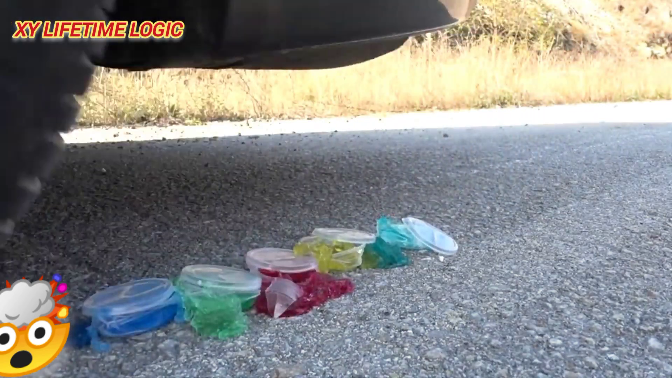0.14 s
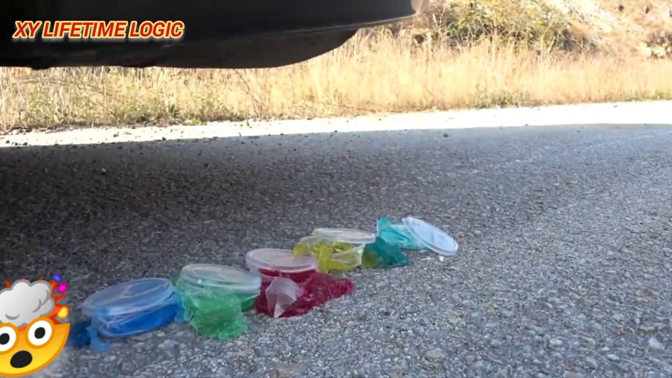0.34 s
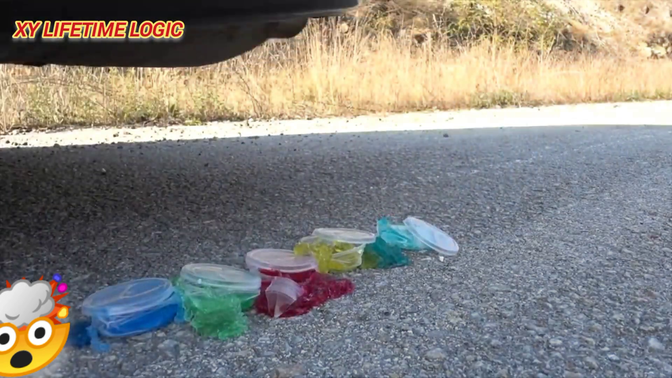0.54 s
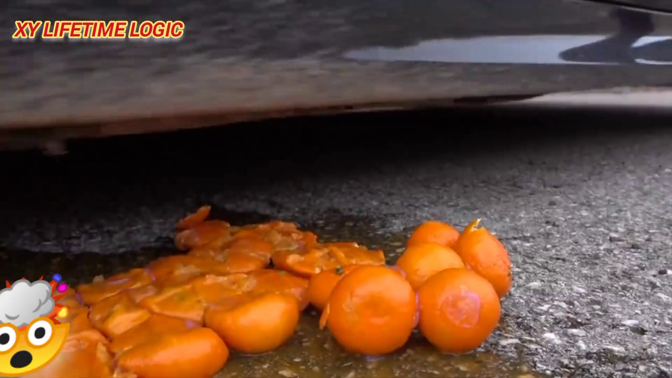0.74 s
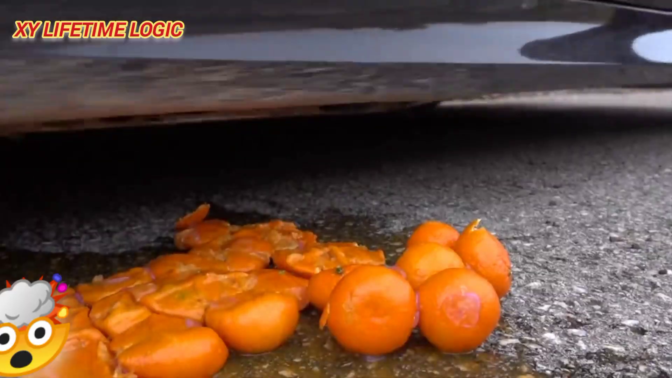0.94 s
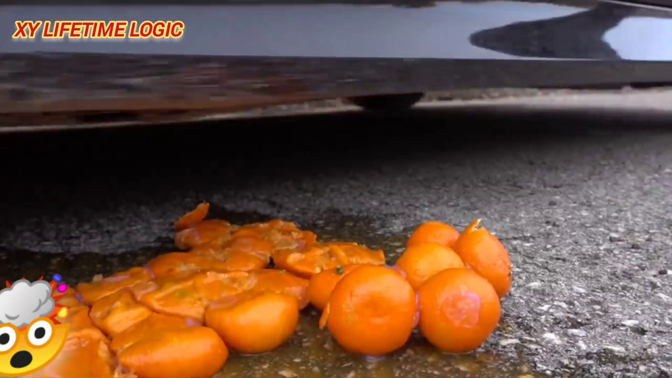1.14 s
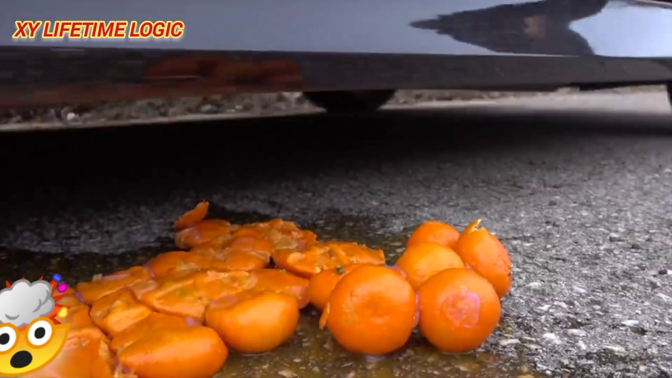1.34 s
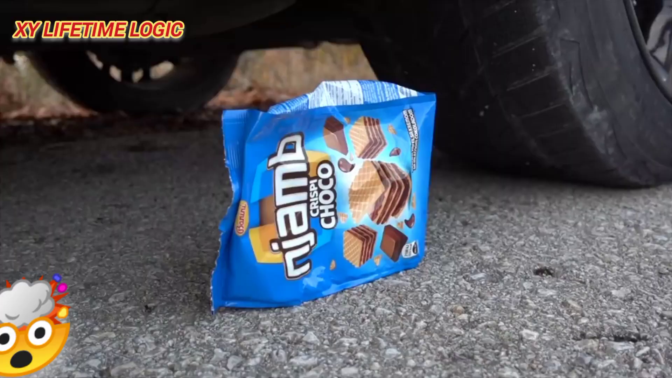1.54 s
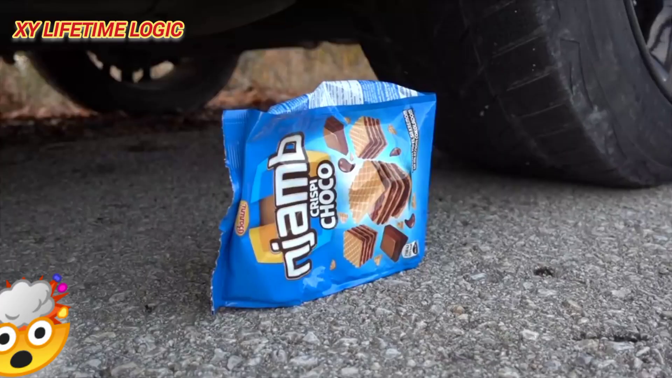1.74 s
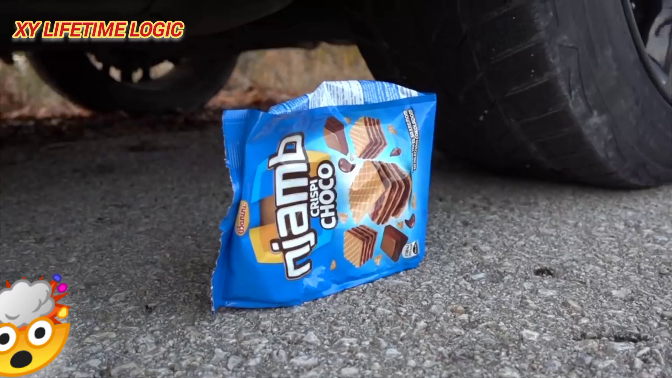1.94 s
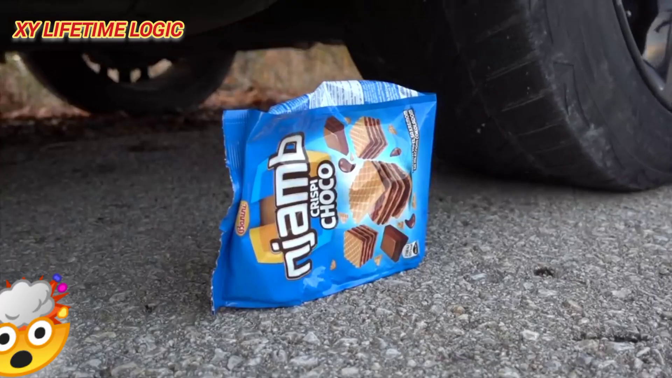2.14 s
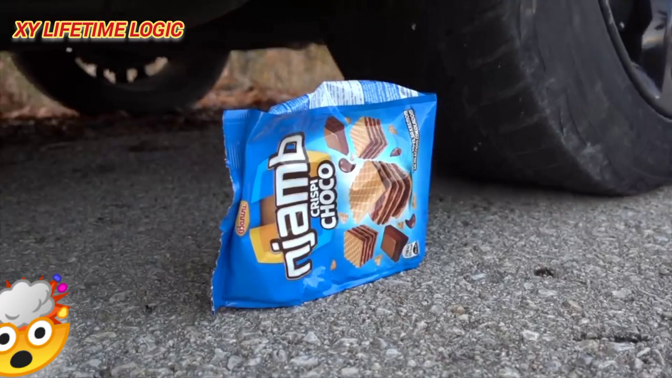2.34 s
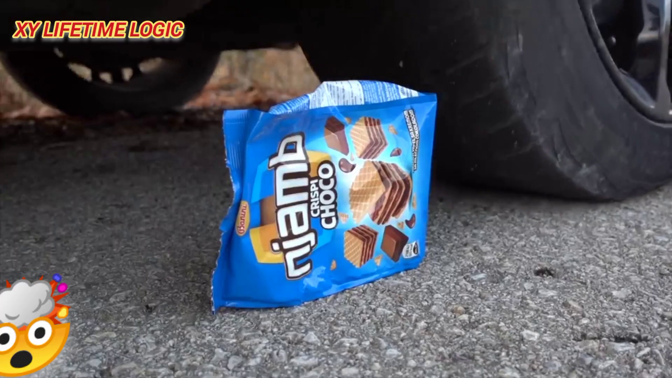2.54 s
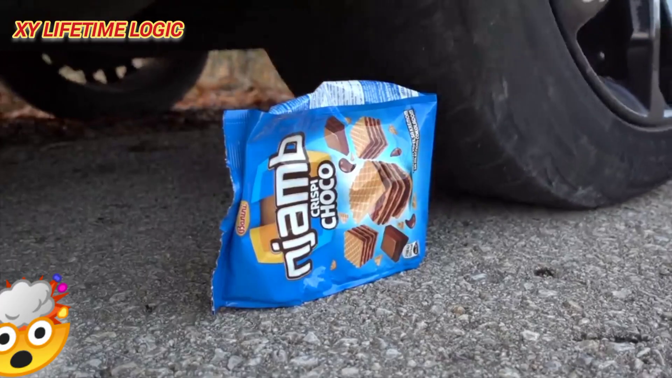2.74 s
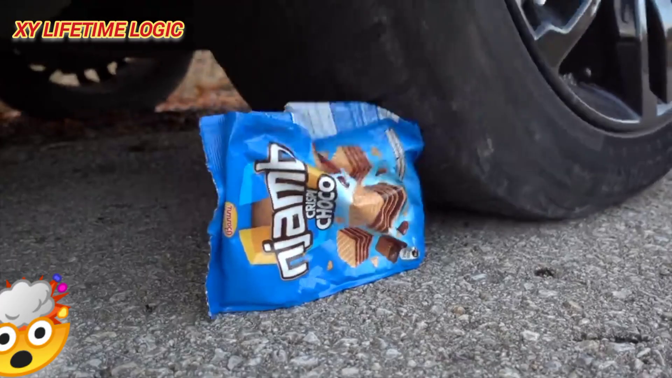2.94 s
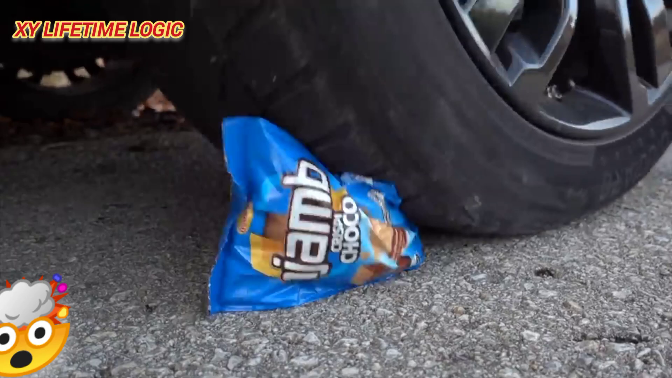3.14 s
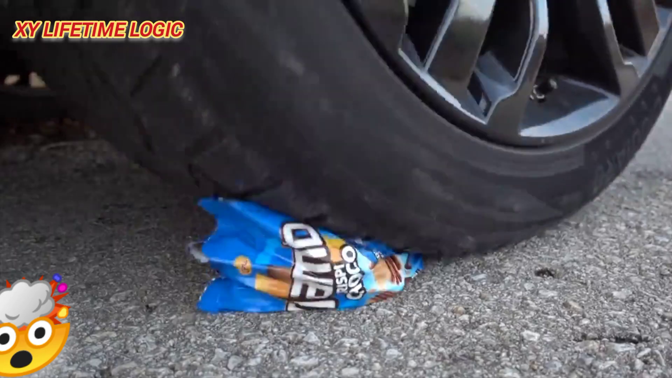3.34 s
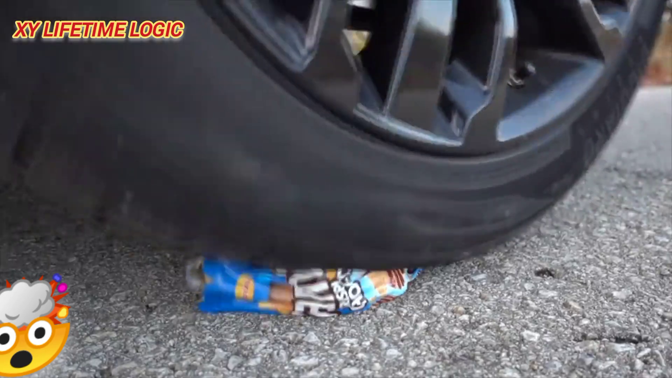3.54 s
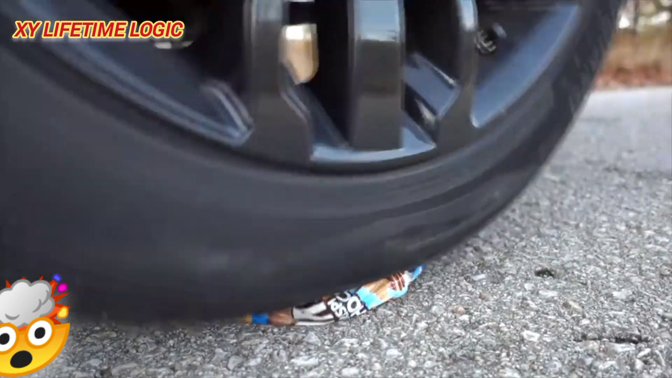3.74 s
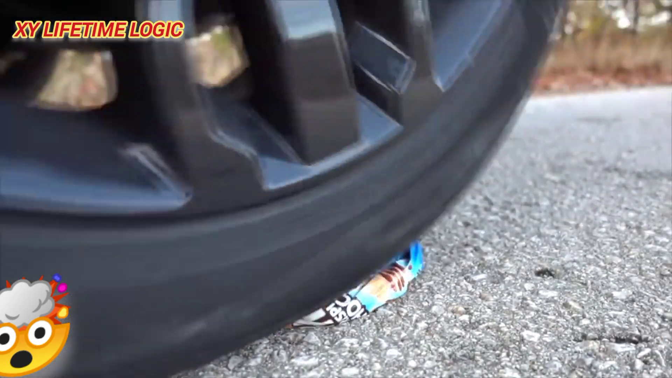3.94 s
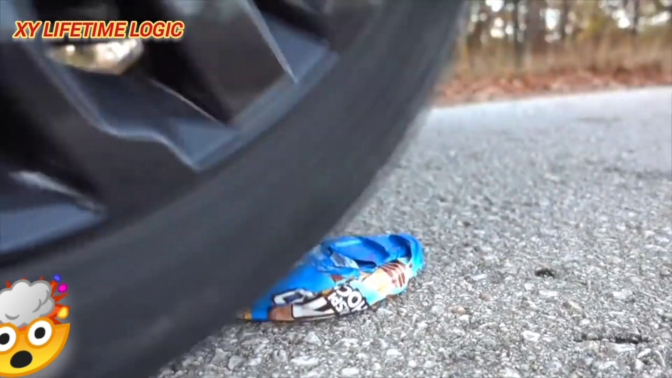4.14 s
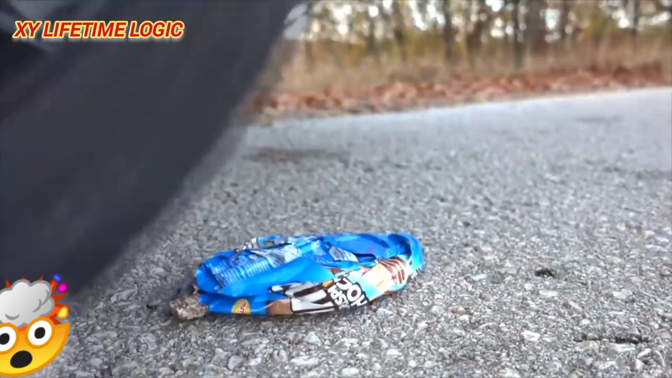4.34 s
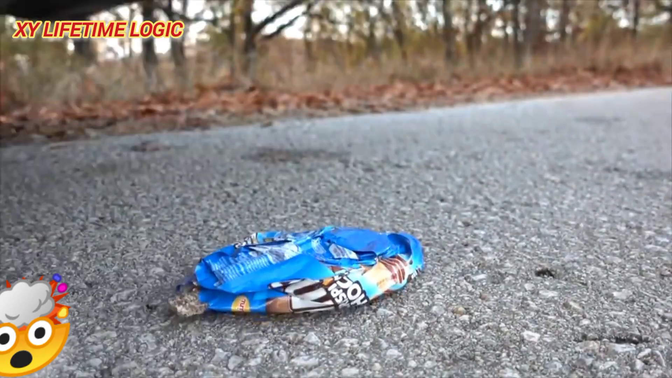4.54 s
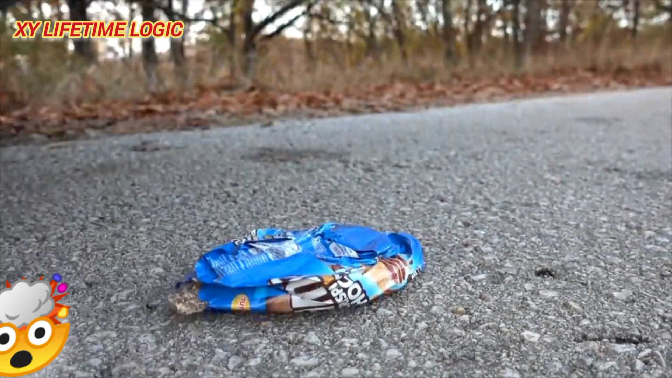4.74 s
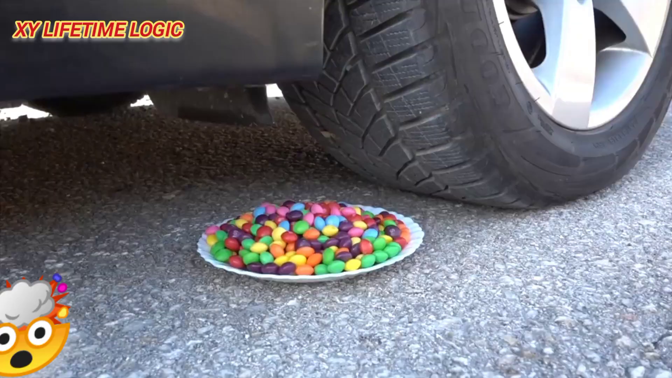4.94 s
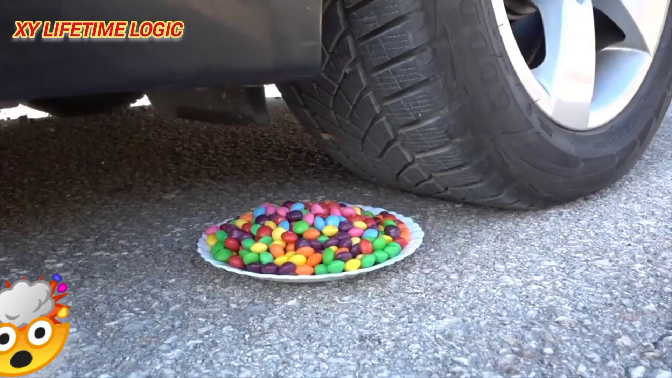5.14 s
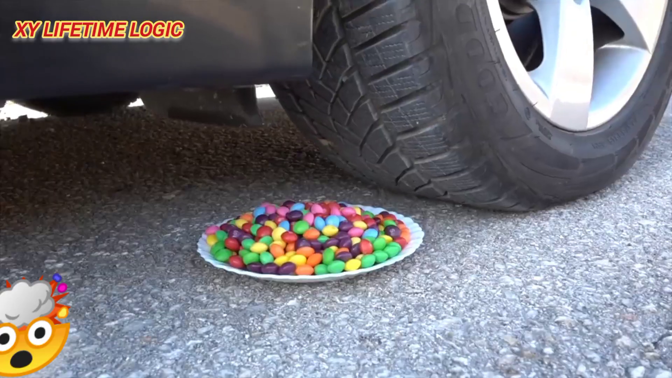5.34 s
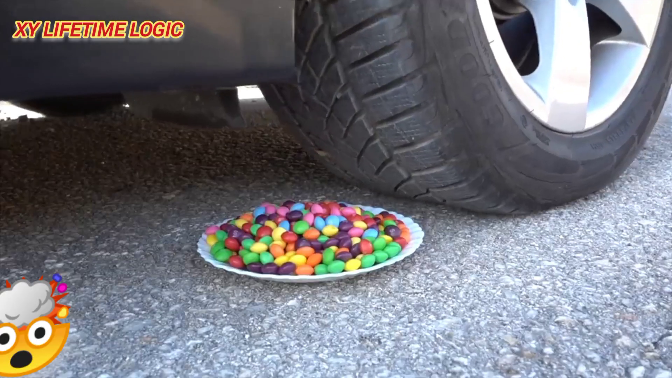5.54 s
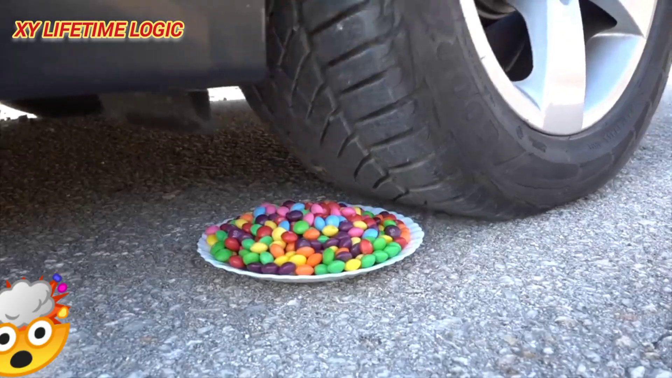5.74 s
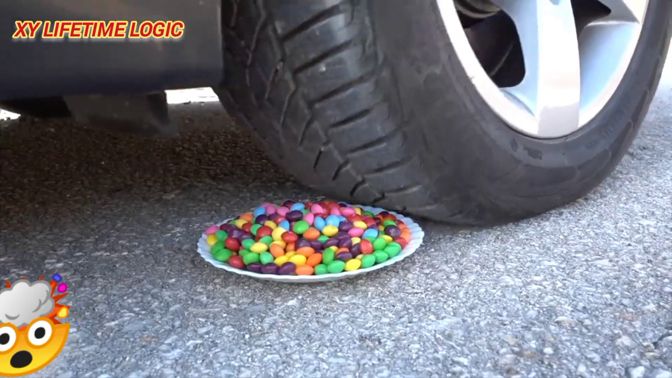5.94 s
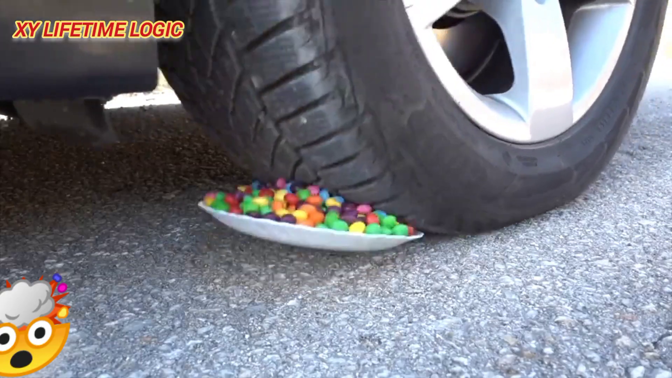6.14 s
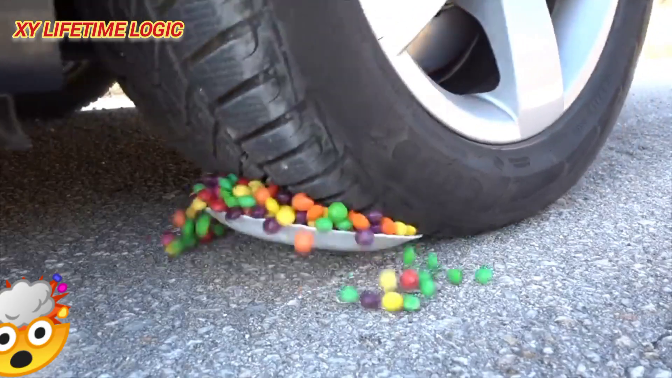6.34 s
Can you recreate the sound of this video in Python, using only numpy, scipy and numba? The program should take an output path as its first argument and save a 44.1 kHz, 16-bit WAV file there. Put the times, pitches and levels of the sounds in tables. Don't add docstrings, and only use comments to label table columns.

```python
import sys
import numpy as np
from scipy import signal
from scipy.fft import rfft, irfft
from scipy.io import wavfile
from scipy.ndimage import uniform_filter1d
from numba import njit

SR = 44100
rng = np.random.default_rng(int(sys.argv[2]) if len(sys.argv) > 2 else 0)


def store_pcm(level_fs):
    pcm = np.round(np.clip(level_fs, -1, 1) * 32767).astype(np.int16)
    wavfile.write(sys.argv[1], SR, np.atleast_2d(pcm).T)


def gain_from_db(level_db):
    decades = np.asarray(level_db, float) / 20
    return 10 ** decades


N = 282240

# freq_hz, level_db
CUPS_SPECTRUM = [(15, -43), (25, -9), (102, 7), (256, 0), (427, -10), (1790, -10.5), (5730, -23.5),
                 (12900, -26.5), (14800, -32), (16000, -51)]
# freq_hz, level_db
FRUIT_SPECTRUM = [(15, -33), (25, -25), (87, -7.5), (206, -6.5), (641, 0), (1440, -1), (3720, -18),
                  (5280, -29.5), (7710, -29.5), (14400, -34.5), (16000, -39.5)]
# freq_hz, level_db
BRAKE_SPECTRUM = [(15, -53), (25, -19), (80, -9.5), (141, -10.5), (560, -14), (659, -12.5), (1160, -24.5),
                  (2990, -20.5), (11600, -30), (16000, -41)]
# freq_hz, level_db
BAG_ROLL_SPECTRUM = [(15, -47), (25, -28), (87, -14.5), (354, -10.5), (416, -2.5), (840, -12.5),
                     (988, -9.5), (1740, -16), (2610, -15.5), (13600, -22), (16000, -36)]
# freq_hz, level_db
PLATE_ROLL_SPECTRUM = [(15, -39), (25, 0), (277, 2), (1190, -9.5), (1520, -5), (1650, -10), (1790, -7),
                       (2410, -10), (2690, -8.5), (3340, -17), (14400, -24), (16000, -36.5)]
# freq_hz, level_db
WAFER_SPECTRUM = [(15, -59.5), (25, -27.5), (190, -6.5), (236, -5), (277, -7.5), (545, -4.5), (1160, -7.5),
                  (1290, -5), (1700, -6), (2990, -3.5), (11300, -8), (14800, -7.5), (16000, -21.5)]
# freq_hz, level_db
FOIL_SPECTRUM = [(15, -49), (25, -24), (180, -13.5), (363, -10.5), (775, -1.5), (863, -1), (936, -4.5),
                 (2160, -9), (7920, -23.5), (14800, -21), (16000, -27)]
# freq_hz, level_db
SWEET_SPECTRUM = [(15, -62), (25, -31), (242, -3), (344, -13), (659, -3), (887, -9.5), (1160, -0.5),
                  (1440, -6), (5430, 1.5), (10700, -0.5), (16000, -15)]

# freq_hz, correlation
WIDE_LIKENESS = [(130, 0.99), (640, 0.98), (1400, 0.57), (4000, -0.13), (15000, 0.13)]
# freq_hz, correlation
NEAR_LIKENESS = [(130, 0.99), (640, .93), (1800, 0.8), (3500, 0.68), (7000, 0.25), (15000, 0.23)]

# time_s, grind_db
CUPS_LOAD = [
    (0.0, -48),
    (0.53, -50),
    (0.692, -45),
]
# time_s, grind_db
FRUIT_LOAD = [
    (0.692, -44),
    (1.346, -45.5),
    (1.45, -39),
    (1.537, -39),
]
# time_s, grind_db
JUICE_LOAD = [
    (0.692, -69),
    (0.95, -70),
    (1.12, -87),
]
# time_s, grind_db
BAG_BRAKE_LOAD = [
    (1.54, -75),
    (1.64, -65),
    (1.72, -53),
    (1.785, -43),
    (1.808, -39),
    (1.85, -49),
    (1.9, -54.5),
    (2.1, -78),
]
# time_s, grind_db
BAG_ROLL_LOAD = [
    (1.54, -66.5),
    (2.1, -59.5),
    (2.654, -52),
    (2.855, -48),
]
# time_s, grind_db
WAFER_LOAD = [(2.855, -48), (2.863, -29), (3.07, -25.5), (3.2, -23.5), (3.36, -26), (3.76, -29.5),
              (3.84, -33.5), (3.91, -36), (3.97, -37.5), (4.01, -45.5), (4.06, -70)]
# time_s, grind_db
FOIL_LOAD = [
    (4.0, -43.5),
    (4.5, -47),
    (4.66, -42.5),
    (4.764, -39.5),
    (4.945, -40.5),
]
# time_s, grind_db
PLATE_BRAKE_LOAD = [
    (4.948, -96),
    (5.04, -71),
    (5.07, -48.5),
    (5.085, -35),
    (5.116, -32.5),
    (5.15, -51.5),
    (5.195, -53.5),
    (5.27, -62),
    (5.33, -67),
    (5.5, -71),
]
# time_s, grind_db
PLATE_ROLL_LOAD = [
    (4.955, -63.5),
    (5.5, -64),
    (5.894, -61.5),
    (6.176, -52),
    (6.194, -56),
]
# time_s, grind_db
SWEET_LOAD = [
    (6.18, -49),
    (6.195, -42.5),
    (6.207, -30.5),
    (6.217, -36.5),
    (6.223, -27),
    (6.25, -25.5),
    (6.37, -27),
    (6.385, -32.5),
    (6.4, -31),
]
# rumble_max_db, rumble_share, rumble_fade_db_per_s, crackle_max_db, crackle_share
EFFORT_ANSWER = dict(cups=(-51.5, 0.4, 60, -57.5, 0.65), juice=(-90, .9, 60, -47.5, 0.5),
                 fruit=(-38.5, .5, 60, -48, 0.26), bag_brake=(-38, 5, 115, -54, 0.5),
                 bag_roll=(-53.5, 0.2, 60, -57, 1.13), wafer=(-40, 0.94, 60, -21, 0.63),
                 foil=(-45.5, 0.6, 60, -49.5, -1), plate_brake=(-38.5, 5.5, 53, -51.5, 2),
                 plate_roll=(-60, 0.5, 60, -59, 0.84), sweet=(-47.5, -0.1, 88, -19, 1.3))

# start_s, hold_s, first_hz, last_hz, level_db
GROANS = [(1.795, .058, 360, 342, -38), (1.8, .035, 715, 690, -45), (1.854, .045, 340, 132, -33),
          (1.8, .025, 135, 133, -44), (1.735, .03, 1515, 1505, -51), (1.812, .055, 1380, 1475, -48),
          (1.79, .03, 1960, 1950, -50), (1.8, .03, 1700, 1690, -50), (1.81, .03, 2560, 2550, -51),
          (1.89, .12, 1010, 1000, -62), (1.695, .05, 940, 930, -58), (1.82, .04, 2300, 2290, -51),
          (1.9, .17, 395, 388, -51), (5.083, .01, 445, 430, -38), (5.12, .031, 150, 143, -31),
          (5.135, .016, 240, 225, -35), (5.16, .05, 215, 205, -45), (5.085, .03, 3620, 3600, -48),
          (5.085, .035, 2720, 2700, -48), (5.08, .045, 1310, 1295, -46), (5.095, .03, 710, 690, -43),
          (5.23, .07, 150, 122, -41), (5.23, .07, 235, 225, -47), (5.23, .05, 400, 380, -52),
          (5.36, .08, 225, 220, -55)]

# start_s, peak_db, body_hz, edge_db
SHELL_KNOCKS = [(0.006, -28.5, 1595, -8), (0.041, -26.5, 543, -12), (0.181, -29, 617, 8),
                (0.453, -26, 562, -14), (0.57, -25, 1440, -24), (0.585, -29, 893, -2),
                (0.607, -28, 1870, -21.5), (0.647, -33, 2190, -3), (0.754, -17, 693, -1.5),
                (0.743, -46, 1200, -15), (0.794, -20, 800, 3.5), (0.794, -16.5, 1452, -10),
                (1.174, -32.5, 1440, -27), (1.229, -18, 1500, -16), (1.245, -28.5, 1256, -23),
                (1.272, -33, 1310, -18)]
# start_s, peak_db, body_hz, edge_db
STONE_KNOCKS = [(1.646, -43.5, 516, -7), (2.112, -41.5, 451, -13), (2.248, -32, 680, -20),
                (2.333, -19.5, 616, -16), (2.41, -37.5, 500, -18), (2.466, -29, 561, -20),
                (2.54, -43, 560, -15), (2.673, -39, 690, -8), (2.797, -42, 715, -5),
                (2.596, -42.5, 524, -1), (2.611, -37.5, 705, -1.5), (2.75, -26, 851, -20),
                (2.76, -28.5, 740, -28), (5.047, -47, 1290, -10), (5.189, -46, 505, -5),
                (5.19, -44.5, 2930, -10), (5.393, -54, 2200, -10), (5.813, -44.5, 475, -22),
                (6.01, -44, 915, -22), (6.113, -38.5, 1150, -7), (6.147, -43, 1370, -10),
                (6.022, -45, 1370, -11)]
# start_s, peak_db, body_hz, edge_db
BAG_KNOCKS = [(2.864, -21.5, 910, -5), (2.909, -22, 584, -13), (3.035, -26.5, 535, -14),
              (3.059, -21, 493, -19.5), (3.109, -17.5, 557, -20), (3.185, -15.5, 613, -5),
              (3.249, -17.5, 572, -18), (3.338, -17, 486, -22), (3.36, -20, 607, -15),
              (3.43, -19.5, 521, -20), (3.537, -34.5, 555, -15), (3.62, -21.5, 684, -22),
              (3.971, -26.5, 506, -20), (3.078, -18, 690, -17), (3.21, -13.5, 507, -16),
              (3.403, -15.5, 590, -2), (3.267, -13.5, 1630, -16), (3.282, -13.5, 521, -29),
              (3.324, -11, 537, -18), (3.302, -17.5, 614, -8.5), (3.481, -18, 670, 1.5),
              (3.856, -10, 726, -35), (3.929, -18, 1590, -1), (4.05, -11, 668, -13.5),
              (4.228, -36, 2300, -10), (4.689, -24.5, 1002, -3)]
# start_s, peak_db, thud_hz
TYRE_DROPS = [(0.756, -16.5, 241), (0.795, -20, 233), (1.117, -32.5, 254), (1.231, -26, 232),
              (1.246, -36, 242), (1.705, -36, 137), (2.867, -27.5, 190), (3.324, -17.5, 249),
              (3.336, -29.5, 104.3), (3.478, -31.5, 245), (5.955, -43.5, 290)]

# start_s, peak_db, ring_hz, pop_db
GRIT_SNAPS = [
    (0.3138, -16, 4300, -46),
    (0.498, -13.5, 4830, -40),
    (0.4984, -15, 8700, -46),
    (0.568, -31, 2890, -6),
    (0.7928, -13.5, 2830, 1),
    (6.021, -40, 2514, -13),
    (6.098, -26.5, 3500, -0.5),
    (6.131, -28, 6000, -9),
    (6.140, -20.5, 5300, -16),
]
# start_s, peak_db, ring_hz, pop_db
WAFER_SNAPS = [(2.862, -14.5, 3160, -19), (2.8918, -10, 2900, -17), (2.9313, -11.5, 3150, -22.5),
               (2.951, -10.5, 3017, -24), (2.96, -10, 4090, -23), (3.054, -11.5, 3860, -17.5),
               (3.095, -7, 3980, -20), (3.122, -7, 3450, -17), (3.138, -5, 2370, -16.5),
               (3.1616, -10, 2620, -16), (3.216, -16, 5040, -19.5), (3.2398, -3, 2890, -18),
               (3.2976, -10, 3000, -14), (3.3055, -10.5, 2240, -17.5), (3.316, -9.5, 2284, -22),
               (3.3706, -9, 3620, -19), (3.3809, -12.5, 3490, -25), (3.393, -13.5, 3660, -13),
               (3.4097, -9.5, 2410, 0), (3.454, -15, 6100, -20.5), (3.4814, -12, 2240, -8),
               (3.4953, -10, 7300, -23), (3.528, -6, 2260, -27), (3.5569, -6.5, 7670, -25),
               (3.575, -10, 4010, -21), (3.582, -8.5, 5100, -24), (3.6038, -8.5, 8140, -22),
               (3.6186, -11, 5600, -19), (3.649, -6.5, 7130, -15), (3.7012, -13, 3140, -12),
               (3.7236, -12.5, 5610, -25), (3.7408, -6, 9090, -14), (3.759, -12.5, 2800, -18),
               (3.7767, -11.5, 2580, -6), (3.7988, -20.5, 3880, -13), (3.807, -9, 9500, -2),
               (3.8215, -19, 2890, -16), (3.8346, -15.5, 4600, -27), (3.8444, -18, 4470, -29),
               (3.8574, -34, 3700, -16), (3.871, -20, 9320, -5), (3.885, -11, 2230, -17),
               (3.9026, -17.5, 8770, -7), (3.9292, -19, 2930, -18), (3.963, -16, 5100, 0),
               (3.98, -13, 2760, -5), (3.988, -18, 2500, -9), (4.017, -26, 2890, -19)]
# start_s, peak_db, ring_hz, pop_db
FOIL_SNAPS = [(4.0663, -28.5, 2280, -5), (4.0816, -32, 2520, 8), (4.098, -18, 3020, 2),
              (4.1092, -27, 2240, -13), (4.1307, -32, 2330, -17), (4.1423, -29, 3450, -17),
              (4.1622, -20.5, 2260, -24), (4.1743, -17.5, 4350, -24), (4.2113, -23, 7540, -15),
              (4.2294, -20.5, 2270, -16), (4.2564, -28, 3880, -22), (4.2736, -10, 4660, -3.5),
              (4.3026, -25, 9000, -16), (4.3133, -19, 8800, -26), (4.3308, -23, 4000, 1),
              (4.3458, -13, 3040, -31), (4.376, -11.5, 3820, -31), (4.4076, -27, 3830, -18),
              (4.4138, -18, 2310, -18), (4.4308, -25, 3490, -23), (4.444, -38, 3190, -13),
              (4.454, -38, 2580, -19), (4.4719, -37, 5080, -19), (4.4966, -39, 2330, -13),
              (4.5177, -42, 3960, -18), (4.5546, -20, 2240, -13), (4.582, -26, 4440, 1),
              (4.591, -25, 4390, -19), (4.616, -26, 2890, -11), (4.6279, -32, 2240, -11),
              (4.653, -22.5, 3230, -20), (4.664, -25, 3830, -16), (4.6899, -18.5, 3300, -11),
              (4.728, -25, 3700, -1), (4.7391, -26.5, 2240, -13), (4.7591, -38, 2240, -5),
              (4.7905, -16.5, 4400, -4), (4.8139, -9.5, 2550, -17), (4.8364, -30, 2280, -14),
              (4.86, -35, 3660, -8), (4.905, -18, 4500, -6), (4.9378, -28, 2230, -16)]
# start_s, peak_db, ring_hz, pop_db
SWEET_SNAPS = [(6.196, -22, 6000, -9), (6.209, -27, 3500, -8), (6.2198, -17, 6300, -13),
               (6.249, -10, 5100, -2), (6.281, -14, 5000, -11), (6.289, -6, 6300, -22),
               (6.2687, -8, 5300, -33), (6.2976, 1, 6340, -25), (6.3107, -9, 4420, -5),
               (6.327, -10, 4370, -4), (6.338, -4, 6590, -18), (6.367, -3.5, 5100, -20),
               (6.373, -7, 5000, -23), (6.39, -3, 8030, -28)]

STAGE_BOUNDS_S = [0.4, 0.692, 1.54, 2.855, 4.948, 5.5]
KNOCK_PAN_DB = [3, 6.5, 13, 8, 6, -8, 5]
RIGHT_LAG_SAMPLES = [1, 3, 4, 1, 0, -1, 0]


def along(table, hz):
    f, value = np.transpose(table)
    return np.interp(np.log(hz + 1), np.log(f + 1), value)


def walk(size, rate_hz):
    hold = int(SR / rate_hz)
    levels = np.repeat(rng.standard_normal(size // hold + 1), hold)
    return 1.283 * uniform_filter1d(levels, hold)[:size]


def sides(pan_db):
    return gain_from_db(np.array([pan_db, -pan_db]) / 2)


def filtered(x, order, cutoff_hz):
    return signal.sosfilt(signal.butter(order, cutoff_hz, "high", fs=SR, output="sos"), x)


@njit
def ring(size, start, hz, t60_s, gain):
    out = np.zeros((2, size))
    for j in range(len(start)):
        turn = np.exp(2j * np.pi * hz[j] / SR - np.log(1000) / (t60_s[j] * SR))
        z = 1 + 0j
        for i in range(start[j], min(size, start[j] + int(t60_s[j] * SR))):
            z *= turn
            out[0, i] += gain[0, j] * z.imag
            out[1, i] += gain[1, j] * z.imag
    return out


def bursts(times_s, peak_db, hz, t60_s, pan_db, count, spread, blow_s, wide_db, together=.5, echo_s=None):
    draw = rng.random((len(times_s), count, 5))
    place = 2 * (np.arange(count) + draw[..., 0]) / count - 1
    pitch = np.clip(np.reshape(hz, (-1, 1)) * np.exp(spread * place), 60, 15500)
    place = place + 2 * (pitch > 15400)
    delay_s = np.reshape(blow_s, (-1, 1)) * draw[..., 1] ** 4
    push = np.where(draw[..., 1] < together, .7, np.sign(draw[..., 4] - .5))
    size = gain_from_db(peak_db)[:, None] * (.5 + draw[..., 2]) / np.sqrt(count)
    size = size * np.exp(-1.5 * place ** 2) * push
    lean_db = np.reshape(pan_db, (-1, 1)) + wide_db * (2 * draw[..., 3] - 1)
    gain = (size * sides(lean_db * np.minimum(pitch / 1200, 1))).reshape(2, -1)
    start = ((times_s[:, None] + delay_s) * SR).astype(np.int64)
    decay_s = np.reshape(t60_s, (-1, 1)) * np.exp(-.5 * spread * place)
    out = ring(N, start.ravel(), pitch.ravel(), decay_s.ravel(), gain)
    if echo_s is not None:
        late = start + np.round(echo_s * SR).astype(np.int64)[:, None]
        out = out + .85 * ring(N, late.ravel(), pitch.ravel(), decay_s.ravel(), gain)
    return out


def effort(load, name):
    s, db = np.transpose(load)
    rumble_db, rumble_share, fade_db_s, crackle_db, crackle_share = EFFORT_ANSWER[name]
    body_lag_s = 0.015
    t = np.linspace(s[0], s[-1], 200)
    grind = np.interp(t, s, db)
    push = rumble_db + rumble_share * (np.interp(t - body_lag_s, s, db) - db.max())
    rumble = np.maximum.accumulate(push + fade_db_s * t) - fade_db_s * t
    crackle = crackle_db + crackle_share * (grind - db.max())
    return np.transpose([t, rumble, grind, crackle])


def grinding(curve, spectrum, likeness, pan_db, rate_hz, scatter_db, bed, cycles, flicker_db):
    s, *band_levels = np.transpose(curve)
    first, last = int(s[0] * SR), min(int(s[-1] * SR), N)
    size = last - first

    draw = rng.random((int(rate_hz * size / SR), 5)).T
    start = (draw[0] * size).astype(np.int64)
    hz = 120 * 130 ** draw[1] ** .6
    t60_s = 1.1 * cycles / (1200 * hz) ** .5
    sizes = gain_from_db(scatter_db * np.minimum(-np.log(1 - draw[2]), 5.5)) * np.sign(draw[3] - .5)
    gain = np.array([sizes, sizes * (3.4 * draw[4] - 1.7)])
    cracks = rfft(ring(size, start, hz, t60_s, gain))
    f = np.arange(cracks.shape[1]) * SR / size
    flat = np.sqrt(uniform_filter1d(np.abs(cracks) ** 2, size=size // 150, axis=1) + 1e-9)
    noise = rfft(rng.standard_normal((2, size))) / np.sqrt(size)

    share = np.clip(bed + (200 / (f + 1)) ** 2, 0, 1)
    mixed = np.sqrt(1 - share) * cracks / flat + np.sqrt(share) * noise
    mid, side = mixed * gain_from_db(along(spectrum, f))
    c = np.clip(along(likeness, f), -.6, .999)
    side = side * np.sqrt((1 - c) / (1 + c))

    low = 1 / (1 + (f / 300) ** 4)
    high = 1 / (1 + (3000 / (f + 1)) ** 4)
    t = np.arange(first, last) / SR
    out, common = np.zeros((2, N)), walk(size, 22)
    for mask, db, lean in zip((low, 1 - low - high, high), band_levels, (.05, .9, .6)):
        m, d = irfft(mid * mask, size), irfft(side * mask, size)
        flicker = flicker_db * (.5 * common + .9 * walk(size, 60))
        swell = gain_from_db(np.interp(t, s, db) + flicker) / np.std(m)
        out[:, first:last] += swell * sides(lean * pan_db + 0 * t) * np.array([m + d, m - d])
    return out


def road_roll():
    to_bag = grinding(effort(BAG_ROLL_LOAD, "bag_roll"), BAG_ROLL_SPECTRUM, NEAR_LIKENESS, pan_db=7.5,
                      rate_hz=1200, scatter_db=0, bed=0.76, cycles=1.3, flicker_db=1.8)
    to_plate = grinding(effort(PLATE_ROLL_LOAD, "plate_roll"), PLATE_ROLL_SPECTRUM, NEAR_LIKENESS, pan_db=5.0,
                        rate_hz=960, scatter_db=3.5, bed=0.86, cycles=3.0, flicker_db=1.5)
    return to_bag + to_plate


def brake_hiss():
    at_bag = grinding(effort(BAG_BRAKE_LOAD, "bag_brake"), BRAKE_SPECTRUM, NEAR_LIKENESS, pan_db=10.0,
                      rate_hz=1500, scatter_db=4.5, bed=0.68, cycles=39.0, flicker_db=0)
    at_plate = grinding(effort(PLATE_BRAKE_LOAD, "plate_brake"), BRAKE_SPECTRUM, NEAR_LIKENESS, pan_db=-1.5,
                        rate_hz=1700, scatter_db=3.5, bed=0.72, cycles=13.6, flicker_db=0)
    return at_bag + at_plate


def brake_groans():
    rise_db_s, fade_db_s, settle = 1100, 650, .3
    t, out = np.arange(N) / SR, 0
    for s, hold_s, first_hz, last_hz, db in GROANS:
        hz = last_hz + (first_hz - last_hz) * np.exp(-np.maximum(t - s, 0) / (settle * hold_s))
        level_db = db - rise_db_s * np.maximum(s - t, 0) - fade_db_s * np.maximum(t - s - hold_s, 0)
        phase = 2 * np.pi * np.cumsum(hz * (1 + .01 * walk(N, 120))) / SR
        out = out + gain_from_db(level_db + 2.5 * walk(N, 50)) * (np.sin(phase) + .15 * np.sin(2 * phase))
    return out


def knocks():
    s, db, hz, edge_db = np.transpose(SHELL_KNOCKS + STONE_KNOCKS + BAG_KNOCKS)
    pan_db = np.array(KNOCK_PAN_DB)[np.searchsorted(STAGE_BOUNDS_S, s)]
    bulk = (650 / hz) ** .8
    body = bursts(s, db + 3, 1.2 * hz, .078 * bulk, pan_db, count=36, spread=.75,
                  blow_s=.009 * bulk, wide_db=3., together=.42)
    blow = bursts(s, db + 0.23 * edge_db + 1.5, 1.2 * hz, .012 * bulk, pan_db, count=8, spread=.65,
                  blow_s=0.0027, wide_db=3., together=0.6)
    edge = bursts(s, db + edge_db + 3, 2000., .024 * bulk, pan_db, count=20, spread=.55,
                  blow_s=.008 * bulk, wide_db=5.)
    thud = bursts(s, db - 22 + 5.5, 270.0, 0.16, pan_db, count=5, spread=0.093, blow_s=0.0083, wide_db=1.5)
    s, db, hz = np.transpose(TYRE_DROPS)
    drop = bursts(s, db + 4.5, hz, 26 / hz, 6., count=5, spread=0.26, blow_s=0.0092, wide_db=1.5)
    return filtered(blow + body + edge, 4, 300) + filtered(thud + drop, 2, 70)


def crushed_cups():
    return grinding(effort(CUPS_LOAD, "cups"), CUPS_SPECTRUM, WIDE_LIKENESS, pan_db=4.,
                    rate_hz=2500, scatter_db=2., bed=.85, cycles=5., flicker_db=1.)


def squashed_fruit():
    flesh = grinding(effort(FRUIT_LOAD, "fruit"), FRUIT_SPECTRUM, WIDE_LIKENESS, pan_db=7.0,
                     rate_hz=2000, scatter_db=1.8, bed=0.65, cycles=11., flicker_db=.9)
    juice = grinding(effort(JUICE_LOAD, "juice"), FRUIT_SPECTRUM, WIDE_LIKENESS, pan_db=8.0,
                     rate_hz=2000, scatter_db=3.0, bed=0.97, cycles=6., flicker_db=1.8)
    return flesh + juice


def wafer_bag():
    wafers = grinding(effort(WAFER_LOAD, "wafer"), WAFER_SPECTRUM, NEAR_LIKENESS, pan_db=2.2,
                      rate_hz=4500, scatter_db=2.3, bed=.42, cycles=10., flicker_db=.8)
    foil = grinding(effort(FOIL_LOAD, "foil"), FOIL_SPECTRUM, NEAR_LIKENESS, pan_db=4.2,
                    rate_hz=1500, scatter_db=2.4, bed=.45, cycles=5., flicker_db=1.2)
    return wafers + foil


def cracked_sweets():
    return grinding(effort(SWEET_LOAD, "sweet"), SWEET_SPECTRUM, NEAR_LIKENESS, pan_db=0.0,
                    rate_hz=5000, scatter_db=2.2, bed=0.4, cycles=12., flicker_db=.9)


def snaps():
    s, db, hz, pop_db = np.transpose(GRIT_SNAPS + WAFER_SNAPS + FOIL_SNAPS + SWEET_SNAPS)
    click = bursts(s, db + 3.5, np.sqrt(9500 * hz), .0024, 2.5, count=18, spread=1.1,
                   blow_s=.0002, wide_db=6., together=1, echo_s=1 / hz)
    bright = bursts(s, db - 5, hz, 0.0098, 2.5, count=6, spread=0.28,
                    blow_s=0.0011, wide_db=5.6, together=0.87)
    splinters = bursts(s + 0.0013, db - 12.5, 6500., 0.025, 2.3, count=30, spread=1.0,
                       blow_s=0.012, wide_db=8.)
    pop = bursts(s, db + pop_db + 6.5, 1500.0, 0.0022, 3., count=6, spread=0.73, blow_s=0.0026, wide_db=3.)
    return filtered(click + bright + splinters, 3, 1800) + filtered(pop, 2, 500)


def scene():
    background = road_roll() + brake_hiss() + brake_groans() + knocks()
    crushing = crushed_cups() + squashed_fruit() + wafer_bag() + cracked_sweets()
    left, right = background + crushing + snaps()
    i = np.arange(N)
    lag = np.array(RIGHT_LAG_SAMPLES)[np.searchsorted(STAGE_BOUNDS_S, i / SR)]
    return np.array([left, right[np.clip(i - lag, 0, N - 1)]])


def band_limit(x):
    return signal.sosfilt(signal.butter(12, 16660, fs=SR, output="sos"), x)


def record(dry):
    rounded = np.tanh(.8 * dry) / .99
    top_cut = signal.ellip(6, .2, 26, 15600, fs=SR, output="sos")
    mix = signal.sosfilt(top_cut, rounded)
    return band_limit(mix)


dry = scene()
out = record(dry)
store_pcm(out)
```